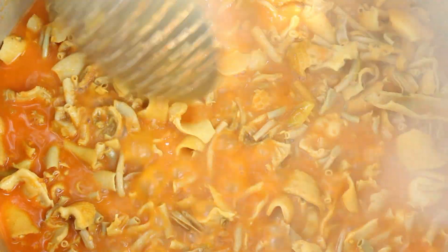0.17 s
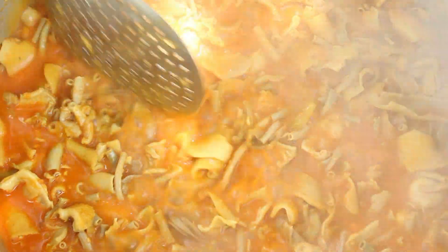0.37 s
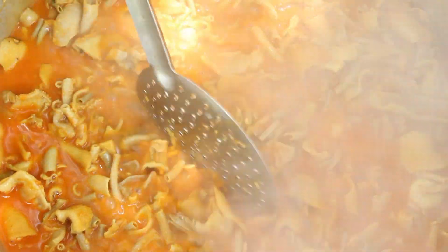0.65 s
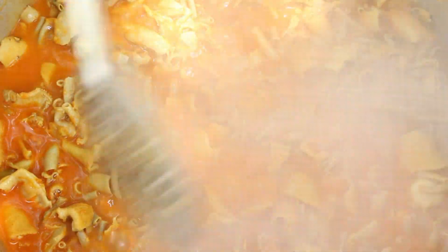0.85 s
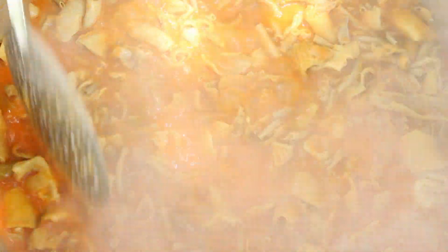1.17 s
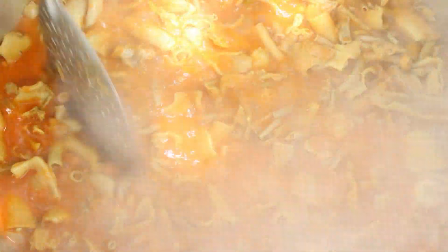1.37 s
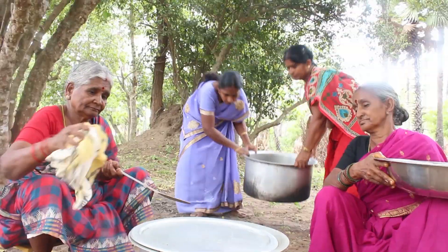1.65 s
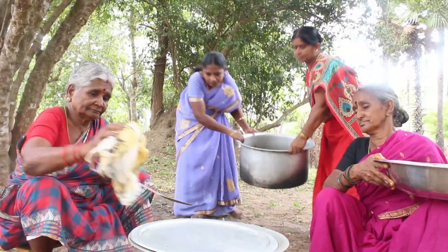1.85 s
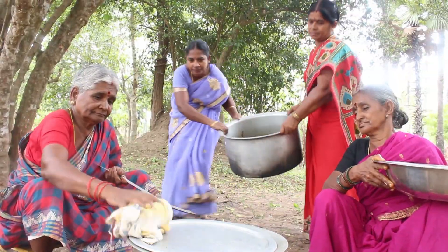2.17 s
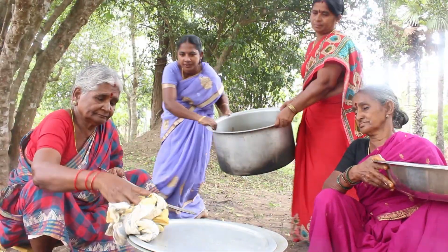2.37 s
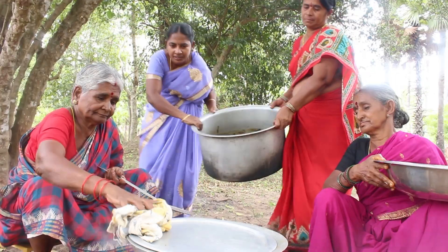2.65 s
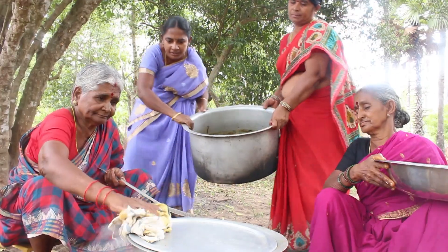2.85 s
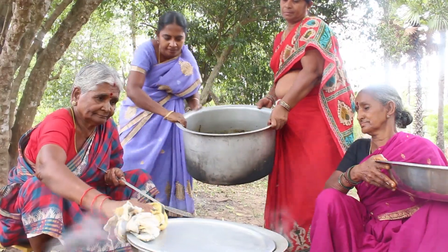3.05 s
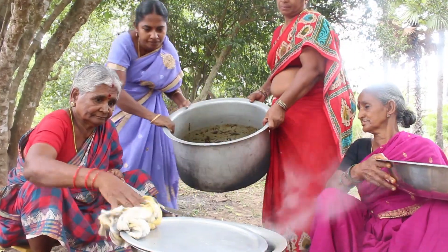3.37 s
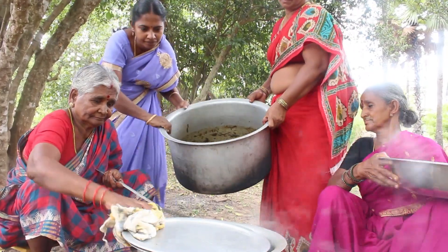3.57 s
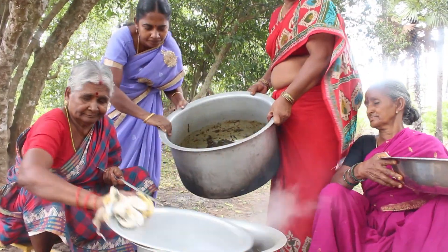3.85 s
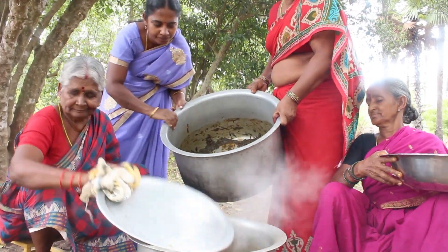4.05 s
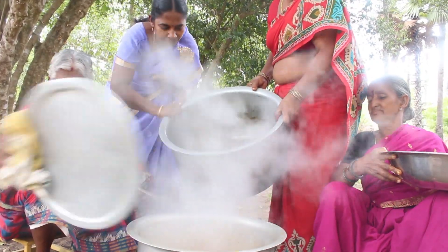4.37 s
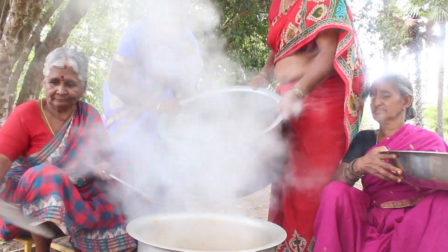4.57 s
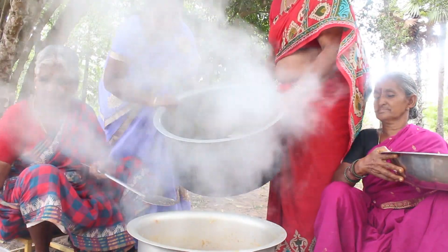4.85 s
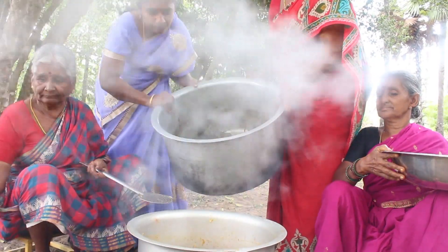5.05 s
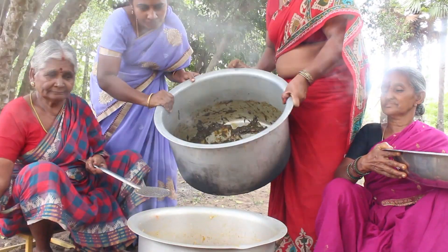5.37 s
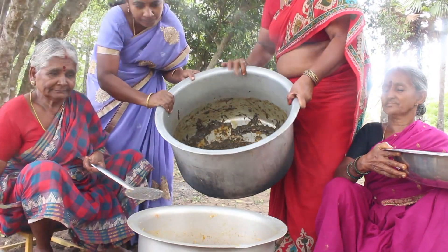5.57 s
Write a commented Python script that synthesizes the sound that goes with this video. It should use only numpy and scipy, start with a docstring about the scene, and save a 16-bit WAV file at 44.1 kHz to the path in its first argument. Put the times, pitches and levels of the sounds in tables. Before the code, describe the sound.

Thick curry bubbles and sizzles close up with a ladle clink, then abruptly a quiet outdoor spot, a scraping lid, faint boiling and a loud pot clatter.

```python
"""Curry simmers close by in a big aluminium pot while a ladle stirs it and clinks on the wall.
On the second clink the scene jumps to a few steps away, under trees: soft thumps, the lid scrapes off
the rim, the open pot bubbles, and a heavy pot knocks and starts to clatter. Bubbles are short decaying
tones; metal is sums of damped modes, struck by bursts or rubbed by random slips; air is shaped noise."""
import sys
import numpy as np
from scipy import signal
from scipy.fft import rfft, irfft
from scipy.io import wavfile
from scipy.ndimage import map_coordinates

SR = 44100
rng = np.random.default_rng(int(sys.argv[2]) if len(sys.argv) > 2 else 0)


def dump(signal):
    """Clip the signal to [-1, 1] and save it as 16-bit WAV at the path in sys.argv[1]."""
    limited = np.clip(np.atleast_2d(signal).T, -1, 1)
    pcm = np.round(limited * 32767).astype(np.int16)
    wavfile.write(sys.argv[1], SR, pcm)


N = 252163
T = np.arange(N) / SR

# the thin lid's free modes: mode_hz, relative_db, t60_s
LID_RING = [(685, -6, 0.39), (1600, -8, .27), (1920, -2.5, 0.27), (2046, -4, .25), (2283, 1.5, .16),
            (2670, -1, .15), (3180, -2, .1), (3600, -12, .1), (4016, -7.5, .15), (4320, -12, .1),
            (4700, -4, .1), (5060, -8, 0.2), (5238, -16, .16), (5700, -13, .1), (5965, -6.5, .11),
            (6331, -6, .08), (7000, -11, .1), (7400, -12, .18), (7854, -5, .13), (8484, -9.5, .16),
            (9636, -13, .1), (10080, -17, .11), (11380, -16, .07), (12700, -27, .06)]


def close_boil():
    """Bubble resonance: swarms of decaying tones simmer and fizz, and single large bursts echo in the pot."""
    # smooth spectra: freq_hz, relative_density_db
    bubbling_spectrum = [(40, -59), (100, -14), (160, -8.5), (230, -10.5), (370, -1), (480, -2),
                         (600, -2.5), (730, -5.5), (865, 2.5), (1200, -6.5), (1950, -2), (2600, -16.5),
                         (4000, -19), (16000, -47)]
    fizz_spectrum = [(300, -21), (1500, 2.5), (3200, 1), (5500, -3), (8500, -9.5), (12000, -17),
                     (16000, -22)]
    # the loudest bubbles bursting: start_s, base_db, pitch_hz, ring_cycles
    burst_rows = [(.0952, -26, 2540, .9), (.1075, -21, 2290, .7), (.1296, -28, 1000, .8),
                  (.2013, -30, 1690, 2), (.208, -28, 1750, 1), (.2902, -22.5, 1700, .7),
                  (.3032, -20.5, 2840, 1.1), (.3097, -19.5, 3680, 1.4), (.4075, -26, 1650, 1),
                  (.4165, -29, 2780, 1.3), (.4379, -27, 2680, 1), (.4506, -24, 2600, .9),
                  (.4585, -27, 2800, 1.2), (.4967, -26, 1900, 2), (.5326, -32, 1080, .7),
                  (.5498, -25, 2120, 1.3), (.5889, -27, 1940, .8), (.5995, -26.5, 1600, .6),
                  (.6123, -27, 1770, 1), (.6889, -19.5, 2700, .9), (.7576, -25, 2170, .8),
                  (.7605, -21.5, 2600, .7), (.7788, -24.5, 2900, .8), (.8703, -27, 2130, 1.2),
                  (.9096, -23, 1510, .9), (.9187, -27.5, 1640, 1.6), (.9422, -27.5, 1190, 1),
                  (.9586, -24, 1680, .7), (.9622, -25, 2200, .8), (.9741, -20, 2090, 1),
                  (.978, -23, 2300, 1.2), (.9928, -22.5, 1800, .8), (1.0065, -23, 1910, 1),
                  (1.0335, -27, 2200, 1), (1.0559, -22, 1100, .6), (1.0934, -27, 3240, 1.2),
                  (1.1045, -28, 3300, 1), (1.169, -27, 1590, .9), (1.2114, -27, 2180, .8),
                  (1.2487, -18, 2100, .55), (1.283, -21, 1910, .9), (1.2985, -27, 1900, 1),
                  (1.3568, -30, 2610, 1.1), (1.3851, -29, 2100, 1), (1.4155, -26, 2000, 1.3),
                  (1.4402, -23, 2010, .8)]
    # fat spitting: start_s, peak_db, pitch_hz, ring_cycles
    spit_rows = [(.033, -28, 5950, 0.96), (.036, -33, 11500, .8), (.188, -39, 9930, .7),
                 (.438, -43, 10750, 4.2), (0.666, -31, 9000, 0.51), (.709, -37, 8700, 2.4),
                 (0.88, -29, 5300, 0.74), (0.9687, -33, 7000, 0.52), (.993, -32, 5300, .6),
                 (1.319, -27.5, 5460, 0.84), (1.393, -28, 4830, 0.85)]
    # surges as stirred curry meets hot metal: peak_s, length_s, bubbling_lift_db, fizz_lift_db
    surge_rows = [(0.098, 0.059, 1, 8), (0.301, 0.021, 4, 8), (0.365, 0.072, 3.5, 7),
                  (0.708, 0.052, 0, 7.5), (.88, 0.027, -0.5, 5.5), (0.996, 0.43, 0.5, 1),
                  (1.2, 0.035, -2, 2), (1.465, 0.089, 2, 4)]
    bubbling_db, fizz_db = -41.5, -49  # steady levels under the surges
    for s, length, bubbling_lift, fizz_lift in surge_rows:
        hump = swell(s, length)
        bubbling_db = bubbling_db + bubbling_lift * hump
        fizz_db = fizz_db + fizz_lift * hump

    swarm = echoes(bubbles(per_s=2800, spread_db=2.0, cycles=1.26), t60=0.011, wet_db=-10.0)
    bubbling = colour(swarm, bubbling_spectrum) * amp(bubbling_db + 1.3 * drift(40))
    crackle = bubbles(per_s=5000, spread_db=3.5, cycles=0.51)
    fizz = colour(crackle + 0.5 * rng.standard_normal(N), fizz_spectrum)
    fizz *= amp(fizz_db + 0.32 * drift(22))

    bursts = small_pops()
    for s, db, hz, cycles in burst_rows:
        cavity = amp(db - 1.5) * blip(hz, cycles, glide=0.0069)
        # the skin snaps higher and shorter than the cavity rings
        skin = amp(db - 16) * blip(1.5 * hz, cycles=0.23)
        add(bursts, s, cavity)
        add(bursts, s, skin)
    for s, db, hz, cycles in spit_rows:
        add(bursts, s, amp(db) * blip(hz, cycles))
    return bubbling + fizz + echoes(low_cut(bursts, hz=400), t60=0.011, wet_db=-7.0)


def small_pops(count=8):
    """Random arrivals: middling bubbles burst by chance, and crowd together where the ladle digs in."""
    pitches_hz = np.geomspace(1240, 2980, count)
    per_s = 45 + 240 * swell(.99, length=.07)
    total = np.zeros(N)
    for hz in pitches_hz:
        bursts = clicks(per_s=per_s / count, spread_db=3.0)
        total += signal.oaconvolve(bursts, blip(hz, cycles=0.95))[:N]
    return amp(-36.5) * total


def ladle():
    """Modal excitation: a clink rings ladle and wall, the spot struck favours some modes, and contact grinds."""
    # ladle on the pot wall: start_s, level_db, contact_s, treble_limit_hz, favoured_hz, favour_db, grind_db
    clink_rows = [(0.3347, -14, 0.003, 12300, 1900, 2, -9), (1.474, -10.5, 0.015, 7000, 4900, 7, -2)]
    # modes of ladle and wall: mode_hz, relative_db, t60_s
    ladle_modes = [(571, -15.5, .11), (1915, -6, .035), (1928, -12, .18), (2020, -12, .03),
                   (2230, -2, .015), (2450, -5, .02), (3600, -5, .011), (4043, -30, .05), (4850, -6, .017),
                   (4920, -31, .13), (5560, 2, .011), (6310, 1, .012), (6950, -8, .02), (7940, -18, .03),
                   (8522, -26, .1), (9480, -21.5, .08), (9608, -26, .07), (10320, -14, .022),
                   (10720, -28, .1)]
    favour_octaves = .6  # reach of the favoured region
    out, t = np.zeros(N), T[:SR // 2]
    for s, db, contact_s, top_hz, favoured_hz, favour_db, grind_db in clink_rows:
        modes = []
        for hz, level, t60 in ladle_modes:
            octaves = np.log2(hz / favoured_hz)
            lift_db = favour_db * np.exp(-(octaves / favour_octaves) ** 2)
            modes.append((hz, level + lift_db, t60))
        grind = high_cut(low_cut(rng.standard_normal(len(t)), hz=890), hz=8650)
        grind *= np.exp(-t / contact_s)
        strike = high_cut(chime(modes, t) + amp(grind_db) * grind, top_hz)
        onset = 1 - np.exp(-t / 0.00066)
        add(out, s, amp(db) * strike * onset)
    return echoes(out, t60=0.1, wet_db=-19)


def lid():
    """Stick-slip friction: the rim catches and slips under the lid and drives its resonances and a low boom."""
    # pulls over the rim: start_s, length_s, rub_db, boom_db, bite_db_per_octave, pitch_shift_share
    pull_rows = [(3.158, 0.043, -47.5, -47, -4.5, 0.0026), (3.211, 0.063, -51.5, -53.5, -1, 0.0082),
                 (3.267, 0.089, -60, -56.5, -1.5, 0), (3.367, 0.23, -65, -63, -5.5, -0.0032),
                 (3.631, 0.11, -52, -59, -5, 0.000096), (3.729, 0.014, -50, -49.5, -5.5, -0.00056),
                 (3.809, 0.094, -54.5, -58, -1.5, 0.00061), (3.861, 0.18, -48, -68, -1.3, .035),
                 (4.218, 0.062, -50.5, -82, 0, 0.0054), (4.276, 0.028, -44, -71, 1.5, -0.012),
                 (4.32, 0.019, -45.5, -66, -1, -0.053)]
    # the rubbed lid's resonances: mode_hz, width_hz, relative_db
    lid_modes = [(501, 12.5, -5), (650, 23, -12), (886.5, 16, 2), (950, 23, -4), (1010, 10, -4),
                 (1383, 21, 4.5), (1456, 24, -1), (1554, 49, -6), (2180, 240, -12), (2220, 100, -33),
                 (2665, 120, -5.5), (3030, 97, -9), (3590, 87, -10), (4090, 70, -13), (4670, 70, -16),
                 (5800, 58, -30), (7000, 59, -17), (7850, 120, -21), (9800, 2000, -48)]
    # spectrum of the grit: freq_hz, relative_density_db
    grit_spectrum = [(60, -35), (250, 2), (900, 33), (3000, 26), (6000, -11), (11000, -20), (14000, -20),
                     (16000, -40)]
    # a pull gathers speed over a share of its length, and dies away when the hand stops
    pulls = moves(pull_rows, rise_share=0.24, release_s=0.0203)
    _, _, rub_db, boom_db, bite, bend = np.transpose(pull_rows)
    slips = unit(clicks(per_s=900, spread_db=1.5)) + 0.62 * rng.standard_normal(N)
    slips = unit(slips) * amp(0.45 * drift(50))

    # the moving contact point pulls the lid's resonances about
    ring = waver(body(slips, lid_modes), blend(pulls, bend), depth=.007, per_s=9)
    rubbing = ring + amp(-7) * scratches() + amp(-9) * colour(slips, grit_spectrum)
    scrape = high_cut(tilt(rubbing, blend(pulls, bite), pivot_hz=1380), hz=10500)
    boom = body(slips, [(245, 20, -3.0), (263.0, 39, 5), (467, 65, -15), (600, 42, -13)])
    boom = low_cut(boom, hz=130)
    rubbed = scrape * strength(pulls, rub_db) + boom * strength(pulls, boom_db)
    return rubbed + rim_rings() + gliding_tones()


def scratches():
    """Impulse response: each tiny snag of the sliding rim wakes one damped lid mode; rms 1."""
    t = T[:SR // 8]
    snags = np.zeros(N)
    for hz, db, t60 in LID_RING:
        ring = chime([(hz, db, .45 * t60)], t)  # contact shortens the free ring
        snags += signal.oaconvolve(clicks(per_s=45, spread_db=2.5), ring)[:N]
    return unit(high_cut(waver(snags, 0, depth=.012, per_s=7), hz=5200))


def rim_rings():
    """Contact damping: catches ring the thin lid, damped by the rim; no two wake the modes alike."""
    # catches, the last slipping free: start_s, level_db, treble_limit_hz, free_ring_share, pitch_shift_share
    catch_rows = [(3.159, -44.5, 5000, 0.15, .13), (3.189, -55, 5000, .16, .12),
                  (4.25, -56, 9000, 0.63, .03), (4.283, -54, 9000, .5, -0.041),
                  (4.298, -51, 12000, .5, 0.014), (4.337, -48.5, 14000, 0.91, 0)]
    out, t = np.zeros(N), T[:SR // 2]
    for s, db, top_hz, ring_share, shift in catch_rows:
        chance_db = 2.5 * rng.standard_normal(len(LID_RING))
        modes = []
        for (hz, level, t60), extra_db in zip(LID_RING, chance_db):
            modes.append((hz * (1 + shift), level + extra_db, t60 * ring_share))
        add(out, s, amp(db) * high_cut(chime(modes, t), top_hz))
    return out


def gliding_tones():
    """Rough gliding tones: the rim squeals, the lid hums low, and the pot's hollow sounds beneath."""
    # start_s, length_s, level_db, first_pitch_hz, last_pitch_hz
    tone_rows = [(3.152, 0.028, -52, 1450, 1440), (3.225, .14, -59, 268, 278), (3.28, .07, -64, 2420, 2400),
                 (3.3, 0.32, -63, 885, 899), (3.67, .075, -54, 238, 255), (3.678, 0.088, -58, 890, 885),
                 (3.727, 0.024, -47, 1445, 1458), (3.81, .045, -54.5, 250, 238),
                 (3.852, 0.14, -50.5, 1435, 1475), (3.872, 0.086, -51.5, 870, 925),
                 (3.968, 0.093, -54, 1030, 1043), (3.987, 0.078, -48, 1510, 1582),
                 (4.222, 0.022, -47.5, 1475, 1430), (4.269, 0.038, -45.5, 1430, 1387),
                 (4.278, 0.042, -50, 2700, 2670), (4.283, 0.062, -53, 475, 470)]
    out = np.zeros(N)
    gains = moves(tone_rows, rise_share=0.21, release_s=0.016)
    for gain, (s, length, db, first_hz, last_hz) in zip(gains, tone_rows):
        glide_hz = np.interp(T, [s, s + length], [first_hz, last_hz])
        hz = glide_hz * (1 + 0.01386 * drift(86.6))
        tone = np.sin(2 * np.pi * np.cumsum(hz) / SR)
        out += amp(db) * gain * unit(tone * amp(3.4 * drift(78)))
    return out


def heavy_pot():
    """Impact and rattle: a hollow knock, rebounds at shifting pitches, then a judder and clatter of hard blows."""
    # knocks: start_s, boom_db, boom_hz, boom_cycles, crack_db, upper_wall_clang_db
    knock_rows = [(5.3662, -20.5, 368, 1.5, -27.5, -28.5), (5.377, -38, 265, 2.6, -36.5, -33.5),
                  (5.392, -44, 332, 2, -38, -46), (5.412, -33.5, 346, 3.5, -40, -40),
                  (5.415, -41.5, 225, 3, -52, -52), (5.431, -33, 352, 2.5, -45, -42),
                  (5.478, -34.5, 439, 4.5, -44, -46), (5.491, -37, 242, 3.6, -45, -38.5),
                  (5.515, -41, 365, 4, -48, -41), (5.55, -47, 235, 3, -48, -44),
                  (5.586, -44, 426, 5.7, -58, -50), (5.6656, -43, 298, 1.8, -46, -46),
                  (5.6758, -30, 333, 1.7, -36, -27), (5.6854, -27, 369, 1.8, -32, -26),
                  (5.6955, -24.5, 327, 1.8, -27, -22), (5.7074, -23.5, 363, 1.8, -23, -22),
                  (5.7135, -34, 378, 2, -24, -18)]
    # wall resonances, low to high: mode_hz, width_hz, relative_db
    pot_modes = [(248, 30, -5), (333, 26, 1.5), (379, 26, 1.5), (448, 26, -1), (585, 25, -12),
                 (673, 30, -10), (755, 50, -13), (920, 70, -9.5), (1028, 50, -10), (1170, 40, -9),
                 (1310, 90, -11), (1452, 60, -6), (1820, 100, -10), (2030, 60, -13), (2350, 200, -23),
                 (2690, 80, -21), (3250, 200, -25), (3950, 400, -29), (5080, 250, -34), (6270, 70, -25),
                 (8500, 900, -36)]
    # judders as the pot shifts: start_s, length_s, level_db, brightness_db_per_octave
    shift_rows = [(5.389, 0.045, -41.5, -2.5), (5.475, 0.039, -44, -0.5), (5.524, 0.047, -48.5, 0.5),
                  (5.58, 0.16, -52, -3), (5.66, 0.18, -25.5, 1)]
    blows, t = np.zeros(N), T[:SR // 5]
    ring = body(signal.unit_impulse(len(t)), pot_modes)
    ring = amp(3.5) * ring / np.abs(ring).max()
    for s, boom_db, hz, cycles, crack_db, clang_db in knock_rows:
        contact = rng.standard_normal(len(t)) * np.exp(-t / 0.0073)  # rough contact, decay in s
        crack = high_cut(body(contact, pot_modes[4:9]), hz=3000)
        clang = high_cut(body(contact, pot_modes[9:]), hz=8500)
        add(blows, s, amp(boom_db) * blip(hz, cycles, glide=-0.0045))
        add(blows, s, amp(crack_db) * (crack / np.abs(crack).max() + ring))
        add(blows, s, amp(clang_db) * clang / np.abs(clang).max())

    shifts = moves(shift_rows, rise_share=0.36, release_s=0.039)
    _, _, shift_db, brightness = np.transpose(shift_rows)
    slips = unit(unit(clicks(per_s=1200, spread_db=1.0)) + 0.44 * rng.standard_normal(N))
    # harder contact wakes the wall's upper modes
    judder = tilt(body(slips, pot_modes), blend(shifts, brightness), pivot_hz=405, reach=1.9)
    judder = high_cut(judder, hz=8500)
    sound = echoes(blows, t60=0.39, wet_db=-9.5) + judder * strength(shifts, shift_db)
    # rounds off the deep bass and the top treble of the knocks and clatter
    return high_cut(low_cut(sound, hz=200, order=4), hz=7800)


def thumps():
    """Heavy damping: feet and handling give dull pushes with almost no ring."""
    # start_s, base_db, pitch_hz
    thump_rows = [(1.627, -50, 149), (1.651, -54, 160), (1.661, -48, 170), (1.72, -43.5, 784),
                  (1.766, -48, 199), (1.8243, -37.5, 270), (1.829, -44, 430), (1.833, -45.5, 121),
                  (1.857, -41.5, 310), (1.888, -48, 177), (2.215, -61, 170), (3.189, -38, 235),
                  (3.53, -56, 151)]
    out = np.zeros(N)
    for s, db, hz in thump_rows:
        add(out, s, amp(db) * blip(hz, cycles=0.65))
    return low_cut(echoes(out, t60=0.065, wet_db=-0.5), hz=70)


def rustles():
    """Friction noise: cloth gives short soft swells of fine random crackle."""
    # peak_s, level_db, length_s
    rustle_rows = [(2.47, -59, 0.036), (3.1, -55.5, 0.031), (3.26, -58.5, 0.22), (3.972, -51.5, 0.13),
                   (4.676, -58.5, 0.19)]
    level = sum(amp(db) * swell(s, length) for s, db, length in rustle_rows)
    spectrum = [(300, -12), (2500, 6.5), (7000, -9.5), (10000, -14.0), (14000, -18.0), (16000, -22)]
    return level * colour(clicks(per_s=4500, spread_db=3.5), spectrum)


def outdoors():
    """Cavity filtering: the boil rumbles under the lid, then rings the open pot's hollow; noise makes the air."""
    # spectrum of the air under the trees: freq_hz, relative_density_db
    air_spectrum = [(30, -49), (60, -27), (100, -9.5), (160, -2.5), (260, 0.5), (365, 8), (470, 0),
                    (600, 0.5), (900, 2), (1900, -0.5), (3000, -3.5), (6300, -13.5), (10400, -21.5),
                    (15800, -28.5)]
    # levels over time of air, lidded rumble and open boil: time_s, level_db
    air_level, lidded_level, boil_level = [(2.05, -57), (2.4, -56), (2.7, -57), (3.5, -58.5), (4.5, -56)], [(1.48, -64.5), (3.1, -66), (4.2, -87)], [(2.8, -70), (3.4, -69),
                                                                              (4.1, -58), (4.45, -55),
                                                                              (5.7, -52)]
    # air in the pot above the curry: mode_hz, width_hz, relative_db
    hollow_modes = [(338, 44, -7.5), (548, 79, -3), (857, 73, 7), (910, 98, -2), (1334, 100, 5),
                    (1463, 93, 6.5), (1578, 32, 4.5), (1970, 32, -3), (3030, 920, -11)]
    # single bubbles bursting in the open pot: start_s, base_db, pitch_hz
    far_rows = [(4.461, -46, 2450), (4.478, -44, 1480), (4.63, -44, 2080), (4.827, -40, 1400),
                (4.883, -42, 1650), (4.949, -47, 2400), (4.973, -35, 1500), (5.02, -41, 1400),
                (5.072, -42, 2150), (5.154, -43, 1350), (5.226, -45, 2300), (5.229, -46, 3150),
                (5.319, -42, 1550)]
    air = colour(rng.standard_normal(N), air_spectrum) * amp(curve(air_level) + .5 * drift(21))
    swarm = bubbles(per_s=1800, spread_db=2.5, cycles=0.64)
    swarm = colour(swarm, [(100, -12.0), (300, -2.0), (3000, -10.0), (15000, -18.0)])
    rumble = unit(body(low_cut(swarm, hz=120), [(178, 61, 0)])) * amp(curve(lidded_level))
    boil = unit(body(swarm, hollow_modes)) + amp(-14) * plips()
    boil *= amp(curve(boil_level) + 0.22 * drift(38))

    hollow = body(signal.unit_impulse(SR // 10), hollow_modes)
    hollow /= np.abs(hollow).max()
    for s, db, hz in far_rows:
        add(boil, s, amp(db - 5.5) * blip(hz, cycles=4.2, glide=0.012))
        add(boil, s, amp(db - 2) * hollow)
    return air + rumble + boil


def plips(count=10):
    """Bubble resonance: small bubbles ring briefly and rise in pitch; rms 1."""
    total = np.zeros(N)
    for hz in np.geomspace(1860, 3630, count):
        bursts = clicks(per_s=42 / count, spread_db=2)
        total += signal.oaconvolve(bursts, blip(hz, cycles=6, glide=.03))[:N] / hz
    return unit(total)


def bubbles(per_s, spread_db, cycles, count=30):
    """Superposition: swarms of small bubbles of many sizes, with an even spectrum overall; rms 1."""
    swarm = np.zeros(N)
    for hz in np.geomspace(200, 12000, count):
        bursts = clicks(per_s / count, spread_db)
        one_size = signal.oaconvolve(bursts, blip(hz, cycles, glide=0.037))[:N]
        swarm += np.sqrt(hz) * unit(one_size)
    return unit(swarm)


def blip(hz, cycles, glide=0):
    """Damped oscillation: a few cycles that swell quickly and die away, peak 1."""
    u = T[:int(8 * cycles / hz * SR) + 2] * hz / cycles  # time in units of the ring length
    wave = np.sqrt(u) * np.exp(-u) * np.sin(2 * np.pi * cycles * (u + glide * u ** 2 / 2))
    return wave / np.abs(wave).max()


def chime(modes, t):
    """Modal sum: the free ring of modes given as (mode_hz, level_db, t60_s)."""
    return sum(amp(db - 60 * t / t60) * np.sin(2 * np.pi * hz * t) for hz, db, t60 in modes)


def body(x, modes):
    """Forced resonance: rings x through (mode_hz, width_hz, level_db) modes, with hollows between them."""
    t = T[:SR // 4]
    ring = np.zeros(len(t))
    for hz, width, db in modes:
        ring += amp(db) * width * np.exp(-np.pi * width * t) * np.cos(2 * np.pi * hz * t)
    ring *= np.where(t > 0, 1, .5)
    ring = signal.lfilter([1, 1], [1], ring)  # gently softens the treble of each ring
    return signal.oaconvolve(x, ring / np.linalg.norm(ring))[:len(x)]


def clicks(per_s, spread_db):
    """Poisson-like impulses: random clicks of either sign, a few much larger than the rest."""
    size = amp(spread_db * np.minimum(rng.exponential(1, N), 4))
    return size * rng.choice([-1, 1], N) * (rng.random(N) < per_s / SR)


def echoes(x, t60, wet_db):
    """Reverberation: adds dense, decaying reflections."""
    t = T[:SR // 3]
    tail = rng.standard_normal(len(t)) * amp(-60 * t / t60) * (t > .002)
    return x + amp(wet_db) * signal.oaconvolve(x, tail / np.linalg.norm(tail))[:N]


def moves(rows, rise_share, release_s):
    """Motion envelope: each movement (start_s, length_s, ..) rises, holds and dies away."""
    gains = []
    for s, length, *_ in rows:
        rise = np.clip((T - s) / (rise_share * length), 0, 1)
        gains.append(rise * np.exp(-np.maximum(T - s - length, 0) / release_s))
    return np.array(gains)


def strength(gains, levels_db):
    """Power addition: joint gain of overlapping movements, each at its own level."""
    return np.sqrt(amp(levels_db) ** 2 @ gains ** 2)


def blend(gains, values):
    """Weighted mean: a quality that follows whichever movement is under way."""
    return values @ gains / (gains.sum(0) + 1e-9)


def swell(s, length):
    """Gaussian envelope: a smooth hump of height 1 around time s."""
    return np.exp(-(2 * (T - s) / length) ** 2)


def waver(x, bend, depth, per_s):
    """Variable delay: bends every pitch in x by a share, and lets it wander a little."""
    place = np.arange(N) + np.cumsum(bend + depth * drift(per_s))
    return map_coordinates(x, [place], order=3, mode="reflect")


def tilt(x, db_per_octave, pivot_hz, reach=2):
    """Spectral tilt: brightens or dulls x over time, growing up to reach octaves from the pivot."""
    f, t, z = signal.stft(x, SR, nperseg=512)
    octaves = np.clip(np.log2((f + 1) / pivot_hz), -reach, reach)[:, None]
    return signal.istft(z * amp(octaves * np.interp(t, T, db_per_octave)), SR)[1][:N]


def colour(x, spectrum):
    """Linear filtering: weights x by a smooth spectrum, at rms 1."""
    hz, db = np.transpose(spectrum)
    f = np.fft.rfftfreq(N, 1 / SR)
    gain = amp(np.interp(np.log(f + 1), np.log(hz), db))
    return unit(irfft(rfft(x) * gain, N))


def drift(per_s):
    """Low-passed noise: slow chance of rms 1."""
    f = np.fft.rfftfreq(N, 1 / SR)
    return unit(irfft(rfft(rng.standard_normal(N)) * np.exp(-(f / per_s) ** 2), N))


def low_cut(x, hz, order=2):
    """High-pass filter: takes away the bass below hz."""
    return signal.sosfilt(signal.butter(order, hz, "highpass", fs=SR, output="sos"), x)


def high_cut(x, hz):
    """Low-pass filter: takes away the treble above hz."""
    return signal.sosfilt(signal.butter(2, min(hz, .45 * SR), fs=SR, output="sos"), x)


def amp(db):
    """Logarithmic level: decibels to gain."""
    return 10 ** (np.asarray(db) / 20)


def unit(x):
    """Normalisation: scales to rms 1."""
    return x / np.sqrt(np.mean(x ** 2) + 1e-20)


def curve(rows, axis=1):
    """Linear interpolation: one column of a curve at every sample."""
    rows = np.array(rows)
    return np.interp(T, rows[:, 0], rows[:, axis])


def add(mix, s, sound):
    """Superposition: lays a sound into the mix at time s."""
    part = mix[round(s * SR):][:len(sound)]
    part += sound[:len(part)]


def scene():
    """Change of listening point: first over the pot, then abruptly a few steps away."""
    jump_s = 1.4767
    near = low_cut(close_boil() + ladle(), hz=44.4)
    metal = low_cut(lid() + heavy_pot(), hz=110)
    far = metal + thumps() + rustles() + outdoors()
    return np.where(T < jump_s, near, far)[None]


def record(dry):
    """Band limiting: a symmetric low-pass filter takes away the treble above 15900 Hz."""
    band = signal.firwin(511, 15900, window=("kaiser", 9), fs=SR)
    return signal.oaconvolve(dry, band[None], "same")


dry = scene()
out = record(dry)
dump(out)
```